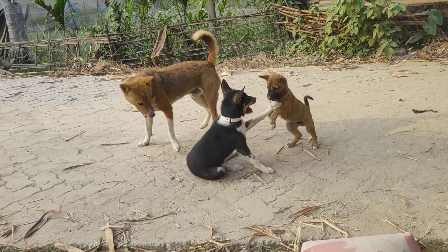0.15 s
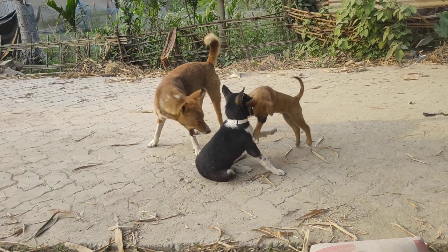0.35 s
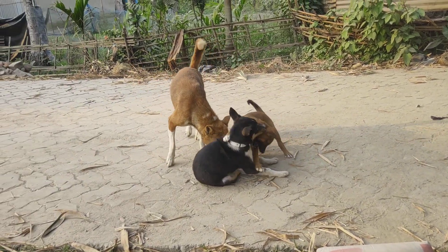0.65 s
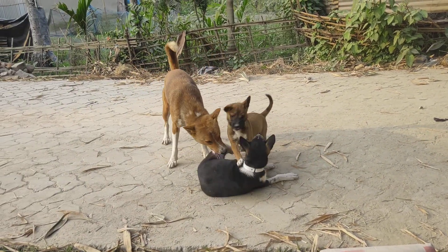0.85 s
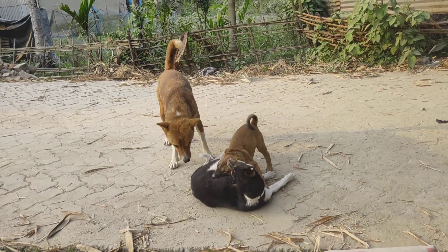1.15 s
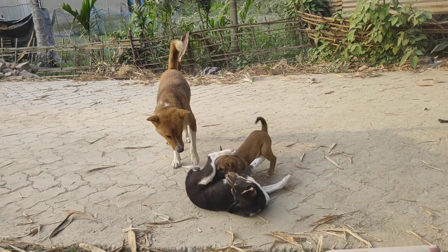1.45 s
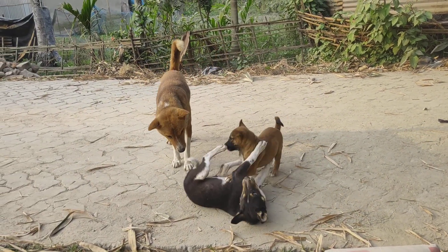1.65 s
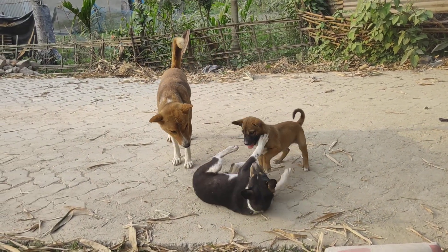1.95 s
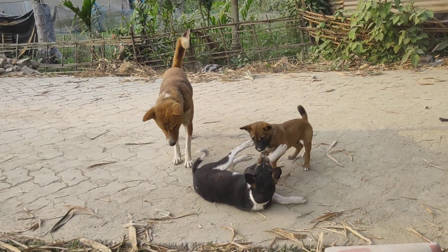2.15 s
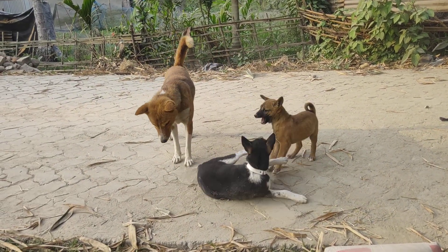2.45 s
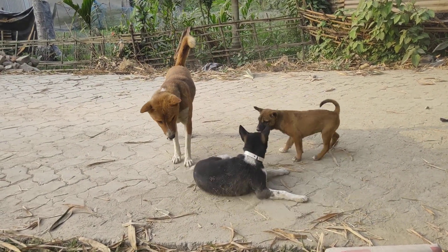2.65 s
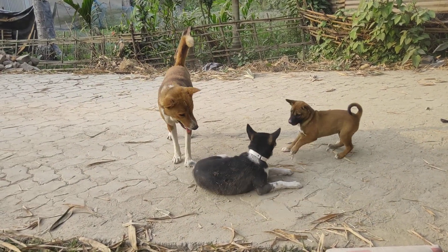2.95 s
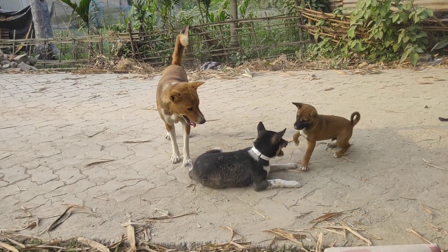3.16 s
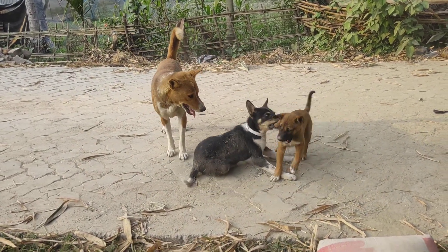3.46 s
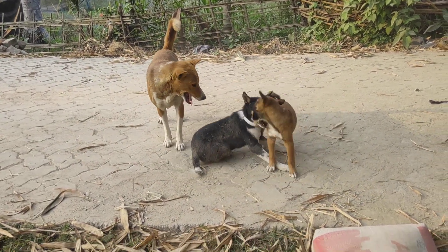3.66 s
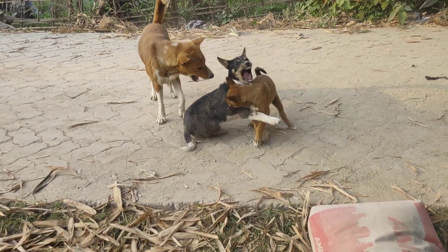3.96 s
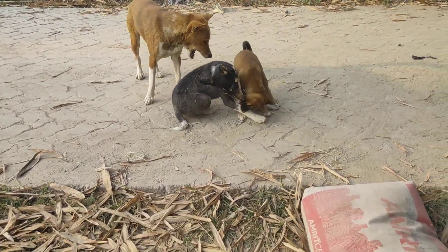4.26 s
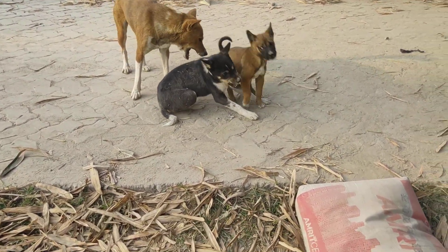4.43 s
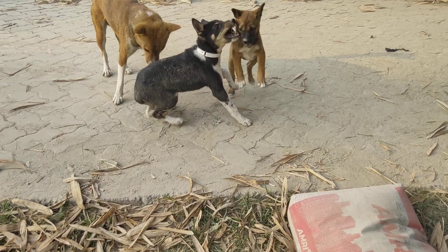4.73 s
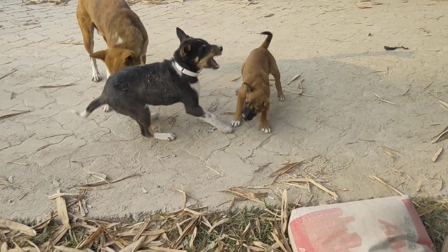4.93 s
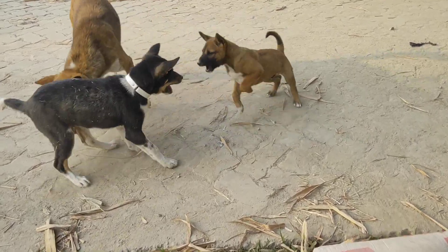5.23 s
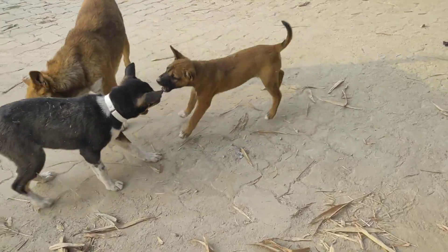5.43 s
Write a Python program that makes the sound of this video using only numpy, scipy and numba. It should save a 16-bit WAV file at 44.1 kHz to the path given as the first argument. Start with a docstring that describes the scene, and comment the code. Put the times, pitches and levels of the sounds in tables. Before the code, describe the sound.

Outdoor yard with faint birdsong: low growls, a pause, then increasingly loud, higher snarling bursts from wrestling puppies, with gritty scuffing and ticking claws.

```python
"""A low country hush and small birds' sliding whistles, then puppies wrestling on hard-baked earth.
The hush is shaped noise, each bird a wavering tone; claws tick as ringing noise and paws scuff random grains.
The puppies gasp and whine in sliding tones. Their growls come in short bursts that grow louder:
a hum with rasping, fluttering air that rings throat, mouth and muzzle. Two ports a few metres away
hear it all in an open yard, with a ground bounce and a faint scatter from hedge and fence."""
import sys
import numpy as np
from scipy import signal
from scipy.fft import rfft, irfft
from scipy.io import wavfile
from scipy.ndimage import uniform_filter1d
from numba import njit

SR = 44100
rng = np.random.default_rng(int(sys.argv[2]) if len(sys.argv) > 2 else 0)


def rack_gain(trim_db):
    """Turn a fader trim in dB into the linear factor to multiply a signal by."""
    fader = np.asarray(trim_db, float)
    return 10 ** (fader / 20)


def waveform_to_disk(signal):
    """Save audio, clipped to [-1, 1], as 16-bit WAV at the path in sys.argv[1]."""
    frames = np.transpose(np.atleast_2d(signal))
    scaled = np.clip(frames, -1, 1) * 32767
    samples = np.round(scaled).astype(np.int16)
    wavfile.write(sys.argv[1], SR, samples)


N = 246519
T = np.arange(N) / SR  # s

# Spectrum of the distant hush: pitch_hz, density_db (per Hz, relative)
HUSH_COLOUR = [(15, -39), (30, -10), (40, 8), (50, -3.5), (80, 9.5), (150, 0), (240, -3.5), (310, -11),
               (400, -31), (850, -33), (1300, -20), (2900, -20), (3700, -34), (6400, -36), (9000, -64),
               (15000, -61)]
# How hard paws work the grit: time_s, level_db (before its wander and the port difference)
SCUFF_EFFORT = [(0, -80), (.14, -72.5), (.28, -65.5), (.6, -69), (1.34, -70.5), (1.48, -67.5),
                (1.65, -75.5), (1.93, -64), (2.18, -71), (2.41, -69), (2.54, -63), (3.0, -73), (3.4, -72.5),
                (3.75, -62), (4.05, -70), (4.43, -68), (5.59, -55.5)]
# Bodies shifting on the ground: peak_s, level_db, rise_s, fall_s (times for 20 dB)
SHUFFLES = [(0, -70, .1, 0.34), (.28, -66.5, 0.11, 0.12), (1.34, -65, 0.051, 0.38),
            (1.93, -66.5, 0.36, 0.51), (2.2, -74, 0.22, 0.066), (2.41, -66, 0.039, 0.5),
            (3.0, -62.5, 0.49, 0.14), (3.2, -72, .3, 1), (3.752, -66, 0.087, 0.21), (4.13, -69.5, 0.55, .1),
            (4.43, -62, 0.52, 0.28), (4.77, -64, 0.14, 0.47), (5.35, -63.5, 0.64, 0.69)]
# Coats brushing and kicking up dust: peak_s, dust_db, fur_db (over dust), rise_s, fall_s (times for 20 dB)
BRUSHES = [(.125, -64, -38, 0.0089, 0.3), (.4, -72, -15, 0.021, 0.47), (.685, -67.5, -1, 0.038, 0.011),
           (.73, -66, -10, 0.078, 0.7), (1.52, -61, -21, 0.13, 0.15), (2.04, -56, -12, 0.071, 0.08),
           (2.369, -70.5, 3.5, 0.012, 0.027), (2.82, -67, -5, 0.53, 0.58),
           (3.315, -57.5, -10.5, 0.049, 0.14), (2.5, -74, -1, 0.0074, 0.059), (3.66, -72, -4, 0.38, 0.47),
           (4.101, -74, -4, 0.08, 0.076), (4.39, -64.5, -13, 0.11, 1), (5.31, -62.5, -9.5, 0.54, 0.18),
           (5.45, -58.5, -5, 0.011, 0.015)]
# Spectra of scuffed grit, dust and fur: pitch_hz, density_db (per Hz, relative)
GRIT_COLOUR = [(180, -40), (300, -12), (796, -12.5), (1000, 6.5), (1080, 8), (1220, 11.5), (2320, 9),
               (8000, -18), (10400, -82), (17600, -120)]
DUST_COLOUR = [(500, -33), (1200, -6), (2500, 0), (4500, -4), (6500, -8.5), (9000, -23), (11000, -23)]
FUR_COLOUR = [(6000, -26), (9000, -1), (13000, -2.5), (15500, 8), (17000, -20)]
# Claw and tooth ticks: start_s, level_db, ring_hz, crack_db (over the ring), t60_s
TICKS = [(0.1248, -56, 2300, 4.5, 0.036), (0.157, -55, 2660, 5, 0.087), (0.2, -53, 2530, 0.5, 0.06),
         (0.245, -51.5, 2640, -8.5, 0.043), (0.2727, -44.5, 2540, -29, 0.079),
         (0.4695, -43, 1810, -20, 0.055), (0.609, -57, 1700, -17, 0.036), (0.684, -50.5, 2730, 2.5, 0.024),
         (0.7027, -41.5, 960, -33, 0.036), (0.704, -48, 700, -30, 0.056), (0.733, -48, 860, -11, 0.04),
         (0.796, -52, 2220, -20, 0.05), (1.09, -53.5, 2440, -8, 0.031), (1.315, -66, 1790, -7, 0.027),
         (1.378, -46.5, 2550, -6, 0.032), (1.494, -44.5, 1800, 3.5, 0.033),
         (1.5197, -43, 2370, -3.5, 0.018), (1.742, -69, 1790, 1, 0.05), (1.796, -42, 1740, -21, 0.017),
         (1.873, -50.5, 1510, -10, 0.041), (1.967, -51, 2280, -1, 0.054), (1.995, -56, 1860, 0, 0.035),
         (2.127, -52.5, 1660, -9, 0.031), (2.361, -56, 2330, -5, 0.055), (2.379, -44, 920, -26, 0.049),
         (2.416, -49, 1850, -18, 0.043), (3.111, -53.5, 1760, -13, 0.076),
         (3.127, -56.5, 2310, -2.5, 0.055), (3.675, -40.5, 1410, -10, 0.076),
         (4.163, -51.5, 1250, -5, 0.035), (4.397, -48.5, 1600, -1.5, 0.048)]
# Spectrum of a tick's crack: pitch_hz, density_db (per Hz, relative)
CRACK_COLOUR = [(200, -21), (600, -2), (1500, 3), (5000, 4), (8000, -4), (11000, -29), (16000, -9)]
# Bird notes: start_s, length_s, from_hz, to_hz, level_db (before waver and blur)
BIRD_NOTES = [(0, 0.086, 3610, 3500, -70.5), (0.254, 0.063, 4420, 3890, -60.5),
              (0.297, 0.094, 3880, 4500, -63.5), (0.835, 0.075, 3000, 3086, -65),
              (1.641, 0.082, 2984, 2925, -68), (1.788, 0.085, 3000, 3500, -70.5),
              (1.873, 0.026, 3500, 2300, -63), (2.52, 0.065, 4930, 4650, -65.5),
              (2.554, 0.047, 4660, 4530, -60.5), (2.659, 0.064, 4110, 3900, -59.5),
              (2.825, 0.062, 3730, 3570, -62), (2.918, 0.079, 3630, 3674, -60.5),
              (2.969, 0.16, 3660, 3560, -64.5), (3.085, 0.072, 3595, 3660, -59),
              (3.152, 0.085, 3725, 3550, -61.5), (3.346, 0.073, 4560, 4590, -68),
              (3.414, 0.0283, 4350, 3960, -60), (3.433, 0.069, 4010, 4410, -60),
              (1.333, 0.028, 4150, 4380, -71), (1.69, 0.026, 4550, 4260, -77.5),
              (4.122, 0.082, 2810, 2990, -73), (4.169, 0.046, 3000, 2620, -63),
              (4.715, 0.051, 5240, 5270, -62), (4.75, 0.055, 5280, 4600, -61),
              (4.777, 0.044, 4650, 3270, -69)]
# A nearer bird's fluttering chirps: start_s, length_s, from_hz, to_hz, level_db (before blur)
BIRD_TRILLS = [(1.168, 0.1, 3160, 3240, -54.5), (1.375, 0.077, 2980, 3190, -60),
               (1.44, 0.055, 3050, 2970, -64)]
# Thin whines: start_s, length_s, from_hz, to_hz, level_db (of the fundamental)
WHINES = [(2.203, 0.11, 1130, 1280, -65.5), (2.277, 0.13, 1294, 1200, -67), (4.125, 0.043, 214, 423, -41.5),
          (4.169, 0.048, 382, 346, -43), (4.309, 0.11, 681, 687, -61)]
# Wheezy gasps, whistles chopped by the folds: start_s, length_s, from_hz, to_hz, level_db, chop_depth (0-1)
GASPS = [(0.197, 0.055, 2150, 1876, -57.5, 0.7), (2.224, 0.049, 2270, 2175, -53, 0.46),
         (2.254, 0.05, 2214, 2036, -50.5, 0.6), (2.293, 0.047, 2490, 2640, -53, 0.66),
         (2.32, 0.1, 2530, 2500, -62, 0.8), (5.354, 0.079, 2320, 2090, -55.5, 0.3),
         (5.36, 0.083, 2053, 1830, -58.5, 0.3)]
# One contour per growl: time_s, pitch_hz, voice_db, open_db (mouth over voice), muzzle_hz (as lips draw back)
GROWLS = [
    [(.58, 140.6, -60, -42, 1880), (.614, 157, -51, -11.5, 1860), (.636, 207, -46.5, -15.5, 1810),
     (.67, 220, -80, 6, 1720)],
    [(.68, 123.6, -57.5, -13, 2030), (.73, 149.3, -55, -7, 1660), (.784, 148.3, -51, -10.5, 2010),
     (.838, 127.8, -54, -13, 1740), (.922, 137, -56, -8.5, 1720), (1.04, 132.1, -51, 0, 1700),
     (1.08, 150, -62, -18, 2040), (1.1, 142, -59, 9, 2320)],
    [(1.08, 98.4, -56, -18, 1800), (1.15, 120.2, -47.5, -5, 1730), (1.222, 125.6, -43, -2, 1850),
     (1.332, 103, -54.5, -7, 2100), (1.35, 99, -72, -5, 1860)],
    [(2.6, 150.2, -61.5, -7.5, 1780), (2.64, 163.6, -45.5, 1, 1630), (2.724, 161.9, -45.5, -6.5, 1550),
     (2.746, 173.2, -44, -3.5, 1690), (2.826, 180.3, -44, -7.5, 1760), (2.922, 187.7, -41.5, -9, 1770),
     (2.968, 164.7, -44.5, -11.5, 1740), (3.02, 180, -82, 8, 1820)],
    [(3.44, 148, -88, 5, 1720), (3.466, 155.9, -44, -2.5, 1750), (3.498, 176, -42.5, -0.5, 1540),
     (3.596, 186.6, -43, 1.5, 1650), (3.654, 191.2, -38.5, -2, 1770), (3.724, 173.7, -42.5, 1, 1800),
     (3.76, 160, -75, -14, 1670)],
    [(3.85, 176, -82, 14, 1660), (3.866, 177.6, -50, -2, 1650), (3.906, 179.7, -46.5, 3, 1720),
     (3.95, 180.7, -50, -9, 1720), (3.99, 179, -99, 8, 1690)],
    [(4.14, 200, -63, -2, 1610), (4.174, 217.5, -39.5, -1, 1480), (4.218, 208, -46, 1.5, 1470),
     (4.258, 204, -40.5, -5.5, 1500), (4.31, 229, -63, -4.5, 1620)],
    [(4.425, 159.7, -56.5, -13, 1810), (4.464, 177.7, -41.5, -10.5, 1650), (4.525, 286.1, -38, 10, 1610),
     (4.556, 295.2, -38.5, 6, 1770), (4.59, 221, -39, -2.5, 1710), (4.64, 223.3, -39.5, 0.5, 1660),
     (4.724, 260.3, -36, 1, 1680), (4.78, 226, -63, -2, 1730)],
    [(4.888, 168.6, -56, -2, 1620), (4.9, 179.3, -45, 3, 1630), (4.94, 190.9, -44.5, 1.5, 1680),
     (4.958, 199.3, -46.5, 15, 1700), (4.975, 220.1, -37.5, 7, 1770), (5.005, 284.3, -37.5, 2.5, 1760),
     (5.035, 295, -34, 5.5, 1610), (5.06, 234.3, -34, 6, 1580), (5.1, 240.2, -35.5, 4.5, 1590),
     (5.17, 240.4, -33.5, 4, 1500), (5.252, 198.3, -40, -7, 1840), (5.3, 159, -74, 8, 1594)],
    [(5.42, 166.6, -94, 3, 2050), (5.436, 175.4, -44, -4.5, 2430), (5.458, 187.9, -39.5, 4.5, 2200),
     (5.54, 241.8, -35, 7.5, 1910), (5.59, 222.6, -40.5, 9, 2000)],
]
# One value per growl: rasp_share (0-1)
ROUGHNESS = [.25, .6, .72, .7, .72, .75, .7, .48, .4, .48]
# Per growl: half_pitch_db (re hum), flutter_hz (loose folds), throat_db (re voice), muzzle_db (re mouth)
VOICES = [(-10, 51, -21, 3), (-5, 29, -17, -2), (-0.5, 130, -11.5, -7), (-7, 140, -12, -2),
          (-9, 73, -17.5, -6.5), (0.5, 51.3, -6.5, 1), (-9, 44.8, 1.5, -11.5), (-34, 82, -5, -8),
          (-50, 72, -5, -8.5), (-31, 66.6, -13.5, -6)]
# Clean overtones per growl: second_db, third_db, fourth_db (re hum, before their wander)
OVERTONES = [(-16, -21, -32), (-22, -30, -40), (-20, -28, -36), (-26, -22, -34), (-26, -30, -38),
             (-24, -30, -38), (-20, -26, -34), (-16, -26, -18), (-12, -26, -13), (-18, -26, -16)]
# Throat resonance: centre_hz, width_hz (of each of two passes)
THROAT = (523, 193)
# Rumble under the hum: centre_hz, width_hz (of each of two passes), level_db (re hum)
CHEST = (249, 196, -13)
# One value per growl, a slack mouth rings wider: width_hz (of each of two passes)
MOUTH_WIDTHS = [300, 420, 420, 270, 210, 270, 260, 250, 250, 260]
# Upper muzzle resonances: centre_hz, width_hz (of each of two passes), gain_db (re muzzle)
UPPER_RESONANCES = [(3500, 144, -11), (4500, 430, -21.5), (5700, 1900, -39)]
# Jaw and tongue at work: time_s, mouth_hz (before its wander), palate_hz, palate_db (re muzzle)
JAW = [(.6, 1270, 2620, -4), (.7, 890, 2640, -2), (1.1, 880, 2700, -11), (1.22, 914, 2620, -2),
       (1.35, 910, 2600, -3), (2.6, 1316, 2600, -18), (2.74, 1160, 2800, 9), (2.982, 1060, 2870, -1),
       (3.45, 1340, 2730, -11), (3.54, 1307, 2710, 0), (3.75, 1330, 2400, -10), (3.86, 1195, 2670, -8),
       (3.98, 1160, 2820, -13), (4.15, 1380, 2630, -17), (4.3, 1240, 2650, -12), (4.46, 1050, 2560, 11),
       (4.505, 1170, 2540, 3), (4.54, 930, 2460, 9.5), (4.575, 900, 2160, 1.5), (4.631, 1046, 2730, 3),
       (4.7, 1010, 2575, -5), (4.77, 1080, 2680, 2), (4.9, 1060, 2550, 1.5), (4.945, 1200, 1900, 4.5),
       (4.985, 1216, 2030, -2.5), (5.015, 1130, 2280, 4.5), (5.055, 1106, 2880, -7),
       (5.12, 1056, 2610, -2.5), (5.19, 1046, 2670, 0.5), (5.27, 1250, 2470, -2), (5.44, 1076, 2450, 7),
       (5.53, 1055, 2400, -7.5), (5.59, 1160, 2440, -5)]
# Lips flash back off the teeth and the muzzle rings out: centre_s, added_db, length_s
SNARLS = [(0.65, 11.5, 0.036), (0.791, 16, 0.056), (2.592, 26, 0.077), (2.754, 5, 0.013), (2.986, 9, 0.067),
          (3.466, 11, 0.018), (3.642, 7.5, 0.068), (3.965, 25.5, 0.037), (4.293, 18.5, 0.032),
          (4.714, 12.5, 0.13), (5.008, 15.5, 0.047), (5.253, 15, 0.059), (5.436, 1, 0.037)]
# Reflections of the yard: bounce_db, scatter_t60_s, scatter_db
YARD = (-33.5, 0.11, -15.5)
# Band that the left port favours: centre_hz, width_hz, lift_db
LEFT_LIFT = (2500, 1600, 4.8)

NOTE_FADE = 0.3  # share of a note's length spent swelling, and again fading
JAW_WANDER = 0.02  # share of the resonance


def unit(x):
    """Normalisation: scale to rms 1."""
    return x / np.sqrt(np.mean(x ** 2))


@njit
def svf(x, hz, width):
    """State-variable principle: two integrators form a band-pass of moving centre, gain 1 there."""
    y, band, low = np.empty(len(x)), 0., 0.
    for i in range(len(x)):
        g, damping = np.tan(np.pi * hz[i] / SR), width / hz[i]
        v = (band + g * (x[i] - low)) / (1 + g * (g + damping))
        band, low, y[i] = 2 * v - band, low + 2 * g * v, damping * v
    return y


def ring(x, hz, width):
    """Cascaded resonance: two equal band-passes give steeper skirts."""
    hz = hz + np.zeros(len(x))
    return svf(svf(x, hz, 1. * width), hz, 1. * width)


def walk(rate, size):
    """Smoothed random steps: a wander of about rate changes a second, spread near 1."""
    k = int(SR / rate)
    steps = np.repeat(rng.standard_normal(size // k + 1), k)
    return 1.5 * uniform_filter1d(uniform_filter1d(steps, k), k)[:size]


def coloured(x, colour):
    """Spectral shaping: weight the Fourier spectrum by (Hz, dB) points, then scale to rms 1."""
    hz, db = np.transpose(colour)
    f = np.maximum(np.arange(len(x) // 2 + 1) * SR / len(x), 1)
    gain = rack_gain(np.interp(np.log(f), np.log(hz), db))
    return unit(irfft(rfft(x) * gain, len(x)))


def play(rows, fade_s=.008):
    """Piecewise-linear contours: sample range, soft-edged window and columns of one table."""
    s, *columns = np.transpose(rows)
    a, b = int(s[0] * SR), min(int(s[-1] * SR), N)
    edge = np.clip(np.minimum(T[a:b] - s[0], s[-1] - T[a:b]) / fade_s, 0, 1)
    edge = np.sin(np.pi / 2 * edge) ** 2
    return slice(a, b), edge, [np.interp(T[a:b], s, c) for c in columns]


def slide(start_s, length_s, from_hz, to_hz):
    """Pitch glide: sample range, swell-and-fade window and pitch of one sliding note."""
    at, edge, (hz,) = play([(start_s, from_hz), (start_s + length_s, to_hz)], NOTE_FADE * length_s)
    eased = np.sin(np.pi / 2 * np.linspace(0, 1, len(hz))) ** 2  # the slide leaves and arrives gently
    return at, edge, from_hz + (to_hz - from_hz) * eased


def whistle(hz, waver):
    """Phase is the integral of frequency: that of a slightly unsteady tone."""
    return 2 * np.pi * np.cumsum(hz * (1 + waver * walk(134.4, len(hz)))) / SR


def swell(s, db, rise_s, fall_s):
    """Exponential growth and decay: climb 20 dB in rise_s to the peak, drop 20 dB in fall_s."""
    return rack_gain(db - 20 * np.maximum((s - T) / rise_s, (T - s) / fall_s))


def place(x, pan_db, lag_s):
    """Interaural principle: left is pan_db louder than right and hears the sound lag_s later."""
    late = np.interp(T[:len(x)] - lag_s, T[:len(x)], x)
    return np.array([late * rack_gain(pan_db / 2), x * rack_gain(-pan_db / 2)])


def hush():
    """Diffuse noise: ports agree in the bass and are unrelated in the treble; each band wavers alone."""
    mid, side = rng.standard_normal((2, N))
    side = signal.sosfilt(signal.butter(1, 900, "high", fs=SR, output="sos"), side)
    both = np.array([coloured(mid + side, HUSH_COLOUR), coloured(mid - side, HUSH_COLOUR)])
    for hz in (350., 600., 1000., 1600., 2500., 4000.):
        waver = rack_gain(2.4 * walk(7.6, N)) - 1
        both = both + waver * np.array([svf(port, np.full(N, hz), 0.6 * hz) for port in both])
    return rack_gain(-63.5) * both


def grit(per_s, scatter_db, colour):
    """Shot noise: dense random grains of uneven size, partly shared by the two ports."""
    struck = rng.random((3, N)) < per_s / SR
    size = rng.standard_normal((3, N)) * rack_gain(scatter_db * rng.exponential(size=(3, N)))
    shared, *own = struck * size
    return np.array([coloured(0.17 * shared + g, colour) for g in own])


def pant():
    """Turbulence grows with flow: gain of air hissing past the teeth, following voice and mouth opening."""
    base_db, share = -43, 0.67  # hiss for a sum of 0 dB; dB gained for each dB of voice plus opening
    out = np.zeros(N)
    for rows in GROWLS:
        at, edge, (_, voice_db, open_db, _) = play(rows)
        out[at] += edge * rack_gain(base_db + share * (voice_db + open_db))
    return out


def ground():
    """Friction noise: gritty scuffs and duller shuffling; dust, fur and panted air hiss above them."""
    scuff = rack_gain(np.interp(T, *np.transpose(SCUFF_EFFORT)))
    scuff = scuff * rack_gain(2.74 * walk(24.98, N))
    left = rack_gain(np.array([[3.], [-3.]]))  # scuffs lean left

    shuffle = sum(swell(*row) for row in SHUFFLES)
    dull = rng.standard_normal(N) + 0.87 * rng.standard_normal((2, N))
    dull = unit(signal.sosfilt(signal.butter(2, [280, 1100], "band", fs=SR, output="sos"), dull))

    air = pant()
    dust, fur = air, rack_gain(-23) * air  # the fur layer also carries the top of the air hiss
    for s, db, fur_db, rise_s, fall_s in BRUSHES:
        dust = dust + swell(s, db, rise_s, fall_s)
        fur = fur + swell(s, db + fur_db, rise_s, fall_s)
    dust, fur = (gain * rack_gain(3. * walk(30, N)) for gain in (dust, fur))
    hiss = dust * grit(11000, 2.2, DUST_COLOUR) + fur * grit(8000, 1.7, FUR_COLOUR)
    return scuff * left * grit(4000, 2., GRIT_COLOUR) + shuffle * dull + hiss


def ticks():
    """Impact excitation: a short hollow rasp with a wide crack at its start, from the left."""
    out, t = np.zeros((2, N + 2048)), T[:2048]
    for s, db, hz, crack_db, t60_s in TICKS:
        crack = coloured(rng.standard_normal(len(t)), CRACK_COLOUR) * np.exp(-t / 0.004)
        build = np.minimum(t / (0.12 * t60_s), 1)
        decay = np.exp(-np.log(1000) * t / t60_s)
        hollow = unit(ring(rng.standard_normal(len(t)), hz, 400)) * decay * build
        onset = np.minimum(t / 0.00079, 1)
        sound = rack_gain(db) * onset * (rack_gain(crack_db) * crack + hollow)
        start = int(s * SR)
        out[:, start:start + len(t)] += place(sound, 7.7, 0.000452)
    return out[:, :N]


def birds():
    """Modulated tones: thin sliding whistles, wavering through the air and blurred by the foliage."""
    out = np.zeros(N)
    for *note, db in BIRD_NOTES:
        at, edge, hz = slide(*note)
        level = np.sqrt(2) * rack_gain(db + 2.2 * walk(60, len(hz)))
        out[at] += edge * level * np.sin(whistle(hz, .004))
    for *note, db in BIRD_TRILLS:
        at, edge, hz = slide(*note)
        flutter = 1 + 0.4 * np.sin(whistle(130 + 0 * hz, .2))  # about 130 Hz, unsteady
        out[at] += edge * rack_gain(db) * unit(flutter * np.sin(whistle(hz, .008)))
    leaves = rng.standard_normal(4096) * np.exp(-np.log(1000) * T[:4096] / .12)
    blur = signal.fftconvolve(out, leaves / np.sqrt(np.sum(leaves ** 2)))[:N]
    return place(out + rack_gain(-4) * blur, 1.5, .00005)


def whines():
    """Harmonic tone: a thin sliding fundamental with a weaker octave."""
    out = np.zeros((2, N))
    for *note, db in WHINES:
        at, edge, hz = slide(*note)
        phase = whistle(hz, 0.012)
        tone = np.sin(phase) + rack_gain(-11.5) * np.sin(2 * phase)
        out[:, at] += place(edge * np.sqrt(2) * rack_gain(db) * tone, 2.3, 0.00019)
    return out


def gasps():
    """Amplitude modulation: a wheezy whistle chopped by the folds at about 211 Hz."""
    out = np.zeros((2, N))
    for *note, db, depth in GASPS:
        at, edge, hz = slide(*note)
        chop = 1 + depth * np.sin(whistle(211 + 0 * hz, 0.2))
        chop = chop * rack_gain(2.5 * walk(150, len(hz)))
        tone = unit(chop * np.sin(whistle(hz, .011)))
        out[:, at] += place(edge * rack_gain(db) * tone, 7.6, 0.00048)
    return out


def folds(hz, rough, half_db, flutter_hz, overtones):
    """Self-oscillation: a near-sine hum at the pitch, with closures and rasping air chopped by loose folds."""
    n = len(hz)
    turns = np.cumsum(hz * (1 + .075 * rough ** 2 * walk(120, n))) / SR
    # every second cycle differs, which adds lines between the harmonics
    slip = 1.3 * rough * walk(70, n)  # radians; the pairing of cycles keeps slipping
    half = np.sin(3 * np.pi * turns + slip)
    half = half + 0.5 * np.sin(4 * np.pi * turns - slip) + 0.24 * np.sin(5 * np.pi * turns + slip)
    hum = np.sin(2 * np.pi * turns) + rack_gain(half_db + 2.2 * walk(140, n)) * half
    hum = hum * rack_gain(2.8 * rough ** 2 * walk(90, n))
    for harmonic, db in enumerate(overtones, 2):
        hum = hum + rack_gain(db + 3.9 * walk(45, n)) * np.sin(2 * np.pi * harmonic * turns)

    closures = unit(np.diff(np.floor(turns), prepend=0) * rack_gain(1.5 * rough * walk(300, n)))
    rasp = unit(np.exp(-(turns % 1) / .8) * rng.standard_normal(n))
    flaps = np.cumsum(flutter_hz * (1 + 0.2355 * walk(50.6, n))) / SR
    flutter = rack_gain(2.5 * np.sin(2 * np.pi * flaps) + .7 * walk(90, n))
    deep = flutter * ((1 - rough ** 1.4) * closures + rough ** 1.4 * rasp)  # low overtones stay more voiced
    source = flutter * ((1 - np.sqrt(rough)) * closures + np.sqrt(rough) * rasp)
    return hum, rasp, deep, source


def head(source, t, muzzle_hz, muzzle_db, mouth_width):
    """Parallel resonators: mouth, muzzle and palate filter the source as jaw, tongue and lips move."""
    n = len(source)
    snarl_db = sum(db * np.exp(-((t - s) / length_s * 2) ** 2) for s, db, length_s in SNARLS)
    s, *jaw = np.transpose(JAW)
    mouth_hz, palate_hz, palate_db = (np.interp(t, s, c) for c in jaw)
    mouth_hz = mouth_hz * (1 + JAW_WANDER * walk(16.8, n))
    muzzle = ring(source, muzzle_hz, 260) + rack_gain(palate_db) * ring(source, palate_hz, 250)
    for hz, width, db in UPPER_RESONANCES:
        muzzle = muzzle + rack_gain(db) * ring(source, hz * (1 + 2 * JAW_WANDER * walk(13, n)), width)
    mouth = unit(ring(source, mouth_hz, mouth_width))
    return mouth + rack_gain(muzzle_db + snarl_db) * unit(muzzle)


def growl(rows, rough, half_db, flutter_hz, throat_db, muzzle_db, mouth_width, overtones):
    """Source and filter: the folds' hum passes straight; their closures and rasp ring chest, throat and head."""
    at, edge, (hz, voice_db, open_db, muzzle_hz) = play(rows)
    hum, rasp, deep, source = folds(hz, rough, half_db, flutter_hz, overtones)
    chest_hz, chest_width, chest_db = CHEST
    chest = rack_gain(chest_db) * unit(ring(rasp, chest_hz, chest_width))
    throat = rack_gain(throat_db) * unit(ring(deep, *THROAT))
    mouth = rack_gain(open_db) * head(source, T[at], muzzle_hz, muzzle_db, mouth_width)
    return at, edge * rack_gain(voice_db) * (np.sqrt(2) * (hum + chest) + throat + mouth)


def puppies():
    """Superposition: gasps, whines and growls; the growls' lag changes as the pups drift across."""
    out = gasps() + whines()
    for rows, rough, voice, width, overtones in zip(GROWLS, ROUGHNESS, VOICES, MOUTH_WIDTHS, OVERTONES):
        at, sound = growl(rows, rough, *voice, width, overtones)
        lag_s = .00012 + .000014 * rows[0][0]  # grows with the growl's start time
        out[:, at] += place(sound, 0.44, lag_s)
    return out


def scene():
    """Reflection: near sounds, a ground bounce and a faint scatter from hedge and fence, over the hush."""
    near = puppies() + ticks() + birds()
    bounce_db, t60_s, scatter_db = YARD
    delay = int(.0031 * SR)  # extra path via the ground
    bounce = np.pad(near[::-1], ((0, 0), (delay, 0)))[:, :N]  # ports exchanged
    t = T[:16384]
    tail = rng.standard_normal((2, len(t))) * np.exp(-np.log(1000) * t / t60_s) * (t > .006)
    tail = signal.sosfilt(signal.butter(1, 500, "high", fs=SR, output="sos"), tail)  # twigs scatter little bass
    scatter = signal.fftconvolve(near, tail / np.sqrt(np.sum(tail[0] ** 2)), axes=1)[:, :N]
    return near + rack_gain(bounce_db) * bounce + rack_gain(scatter_db) * scatter + ground() + hush()


def roll_off(x):
    """The treble ends steeply here."""
    return signal.sosfilt(signal.butter(12, 16360, fs=SR, output="sos"), x)


def record(dry):
    """Port resonance: the left port lifts the low treble."""
    hz, width, db = LEFT_LIFT
    left = dry[0] + (rack_gain(db) - 1) * svf(dry[0], np.full(N, 1. * hz), 1. * width)
    return roll_off(np.array([left, dry[1]]))


dry = scene()
out = record(dry)
waveform_to_disk(out)
```